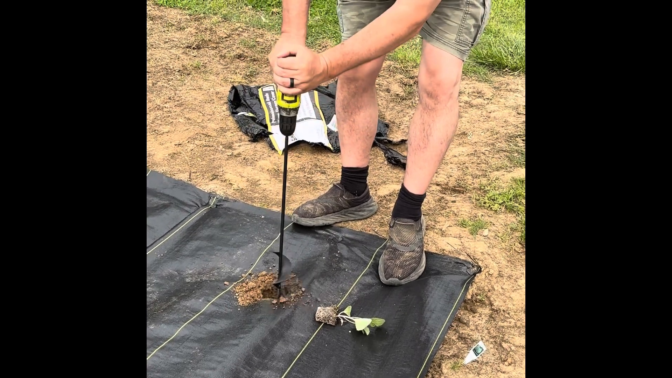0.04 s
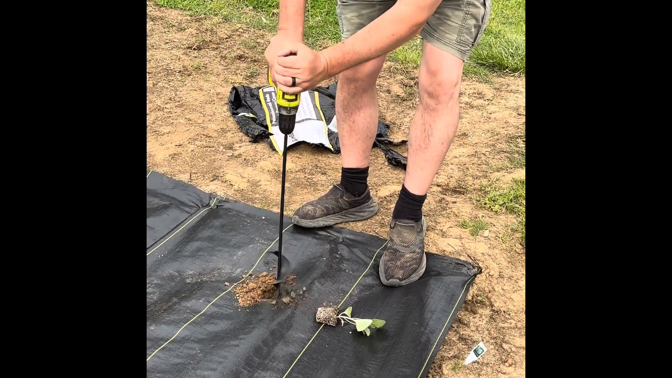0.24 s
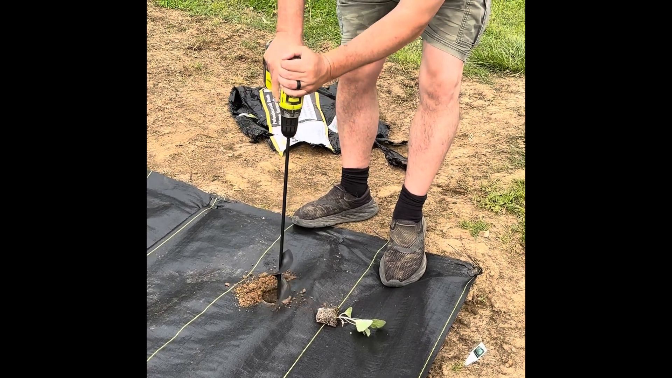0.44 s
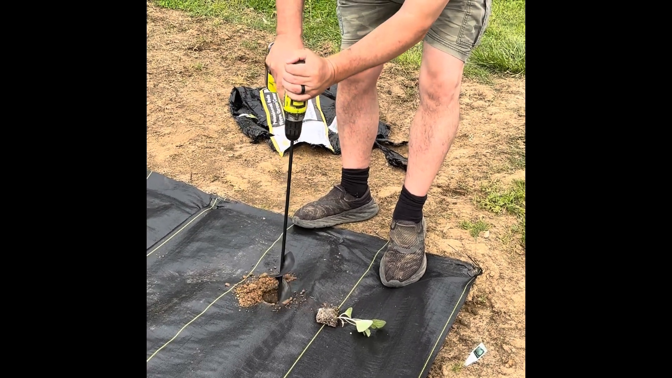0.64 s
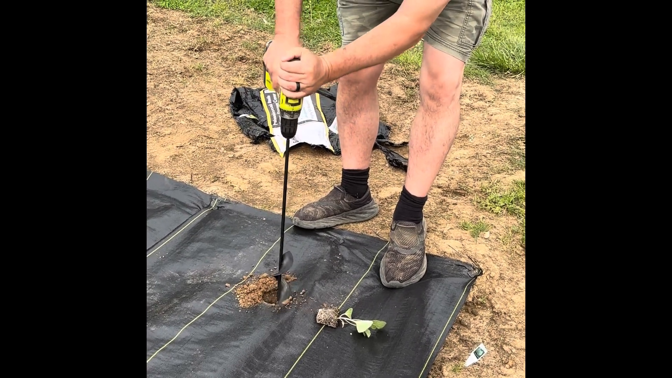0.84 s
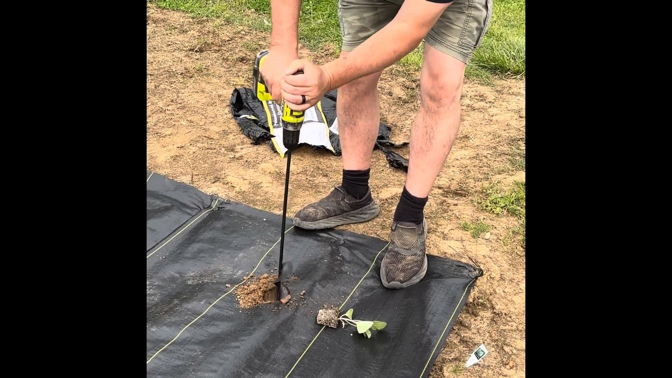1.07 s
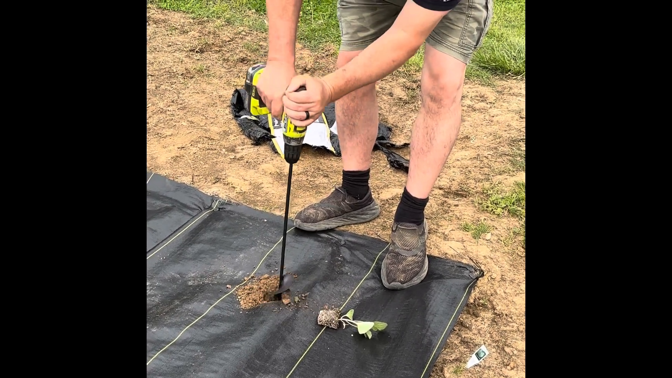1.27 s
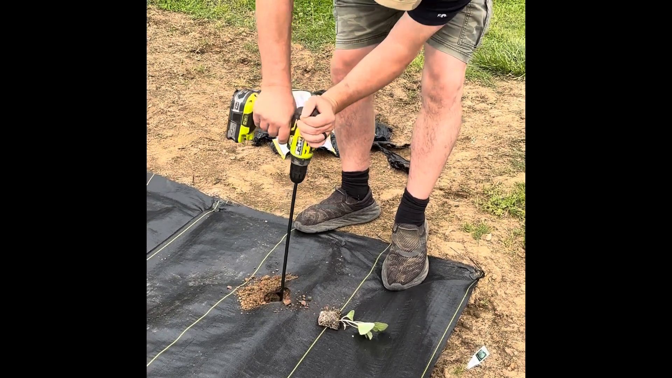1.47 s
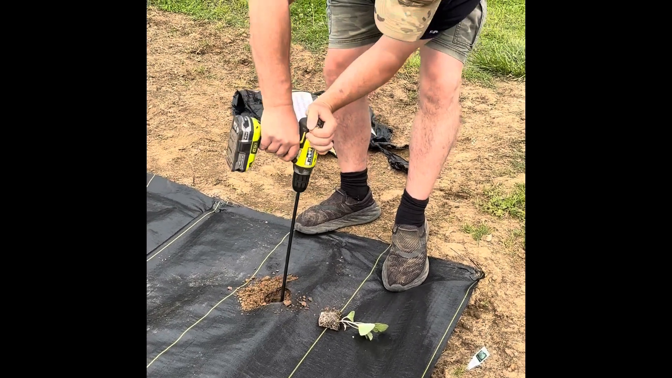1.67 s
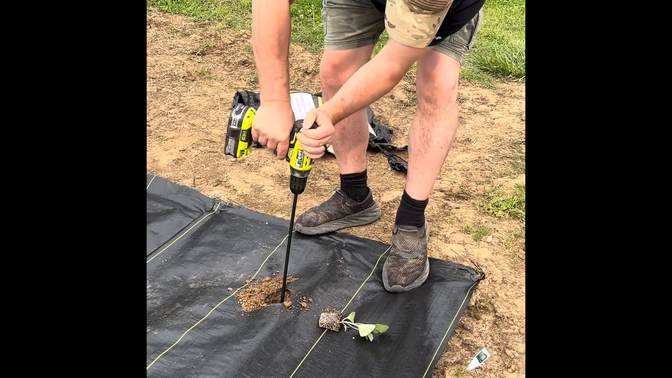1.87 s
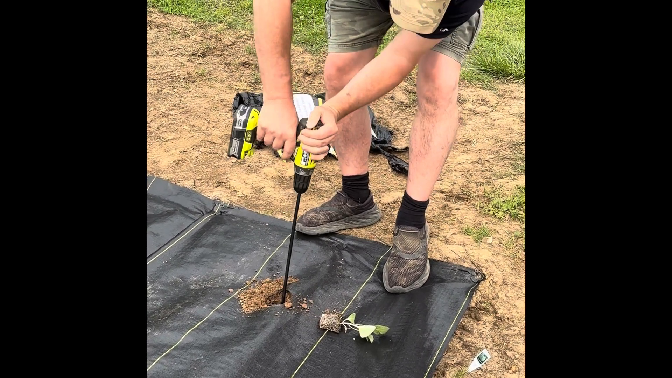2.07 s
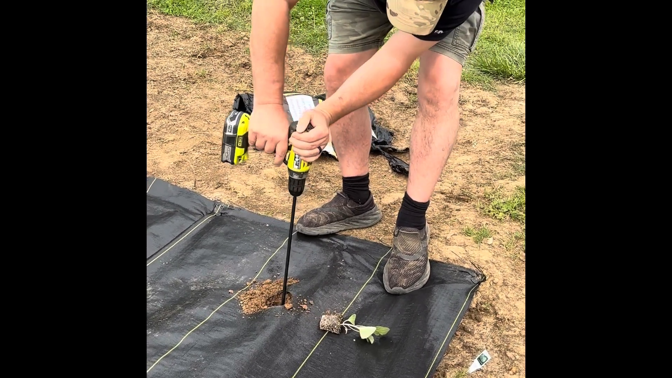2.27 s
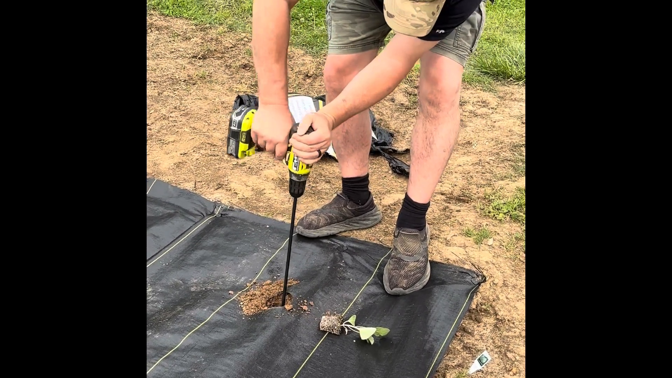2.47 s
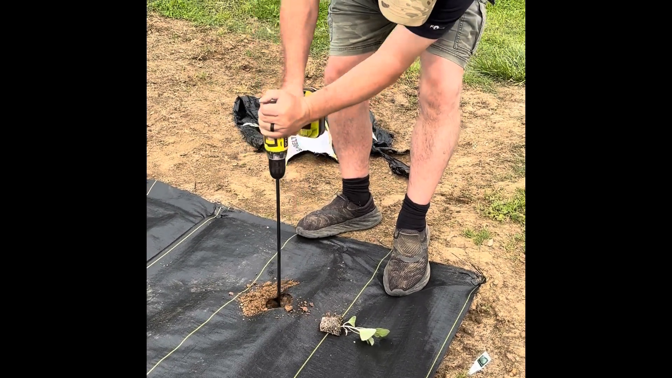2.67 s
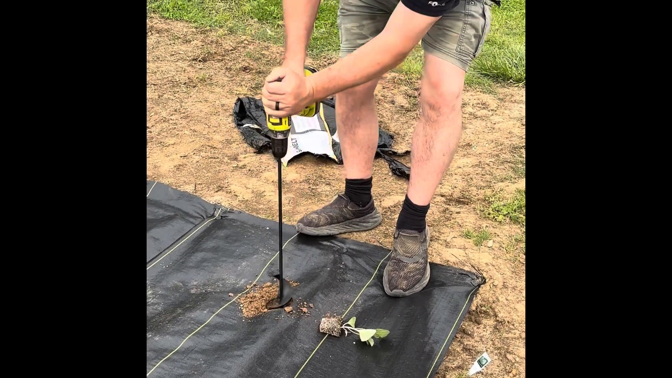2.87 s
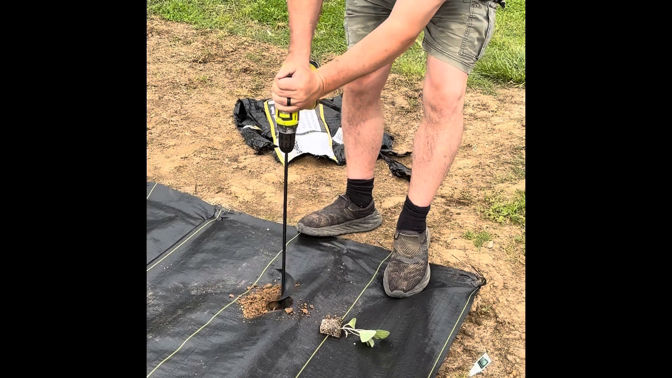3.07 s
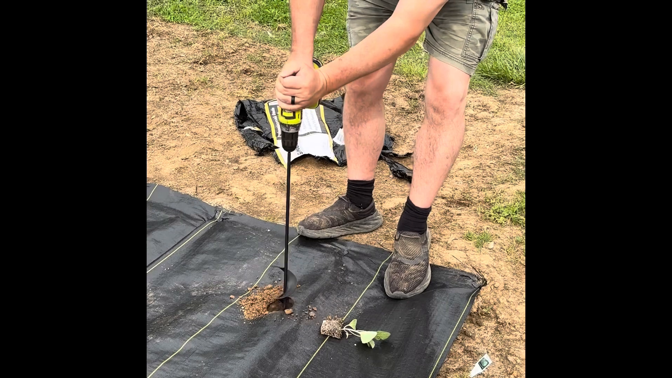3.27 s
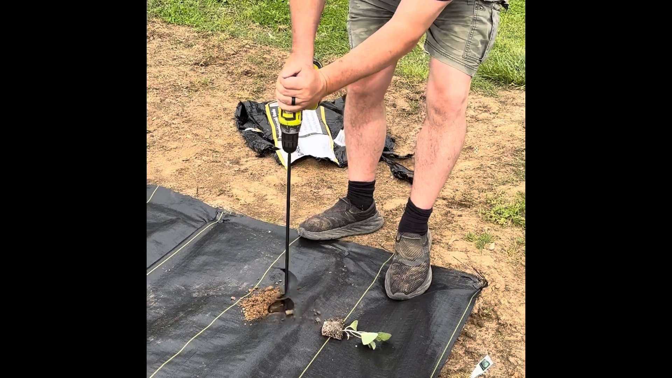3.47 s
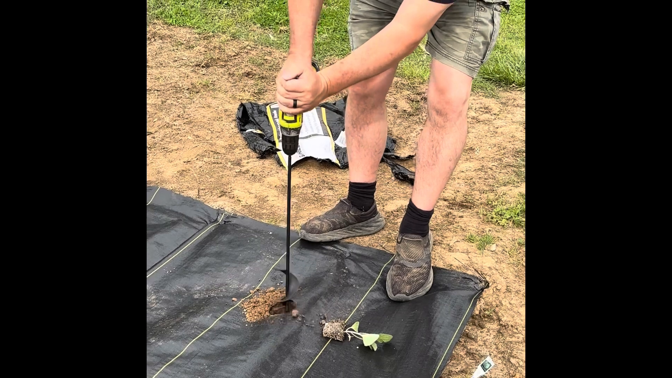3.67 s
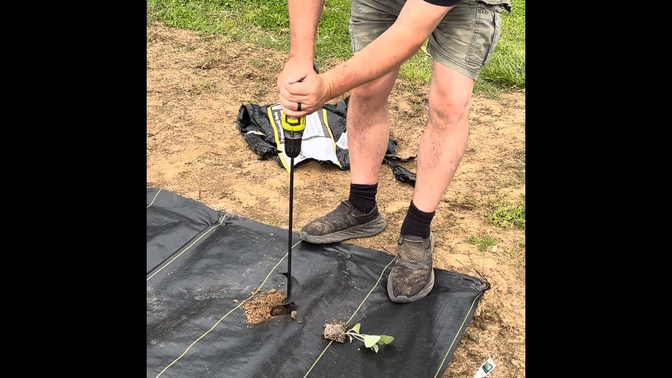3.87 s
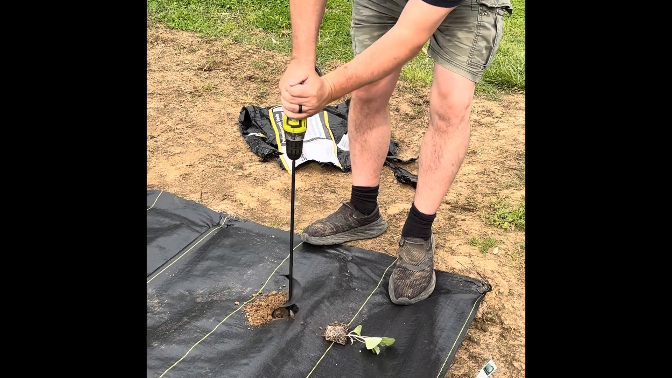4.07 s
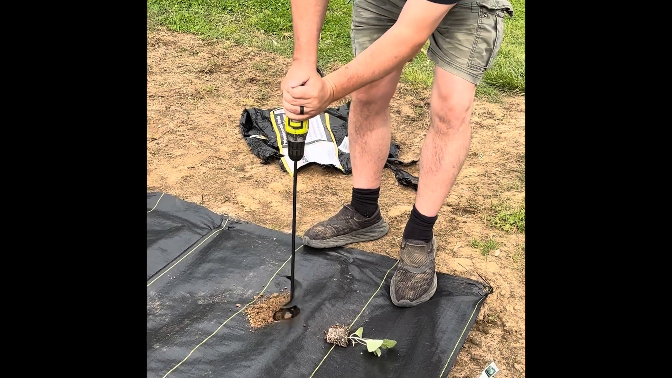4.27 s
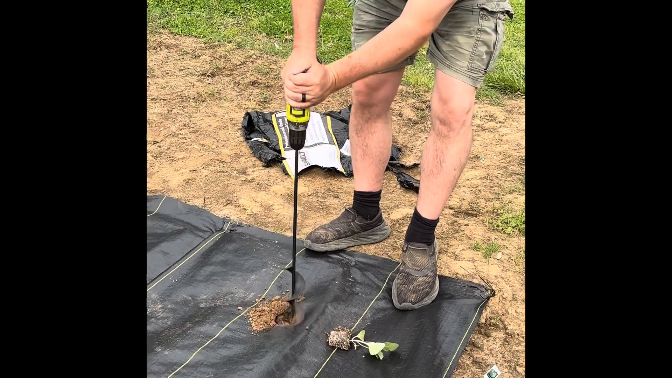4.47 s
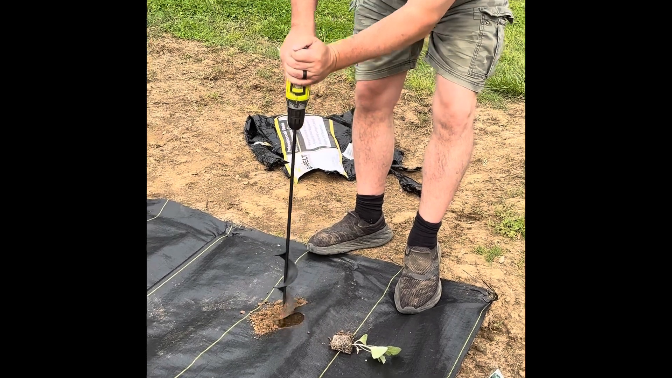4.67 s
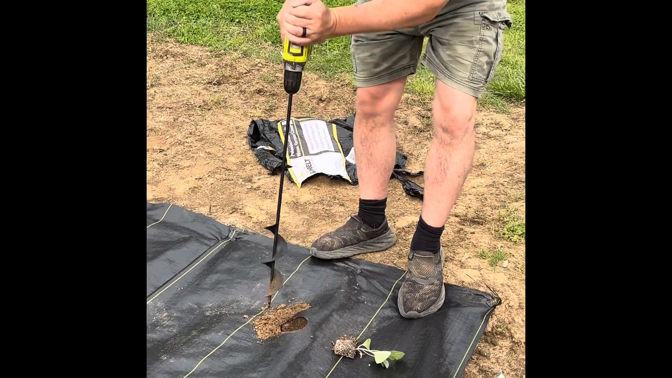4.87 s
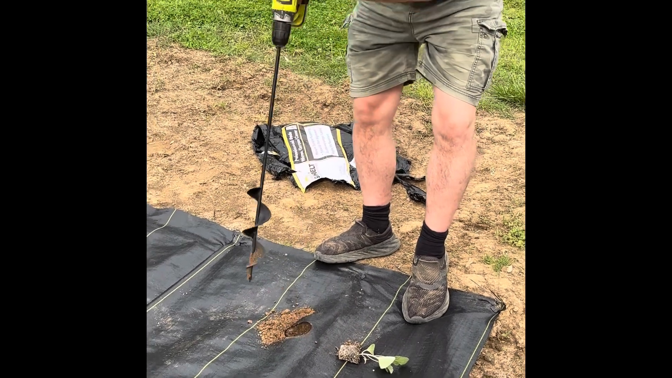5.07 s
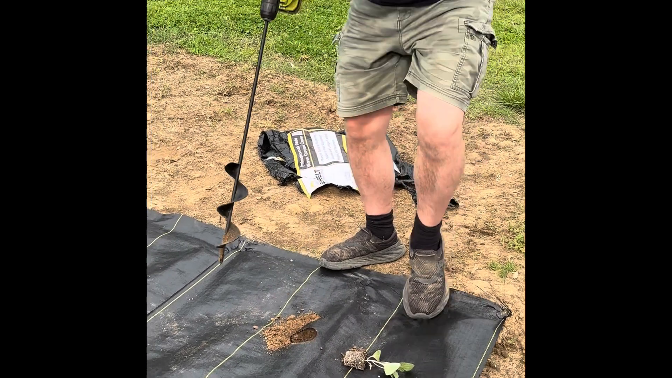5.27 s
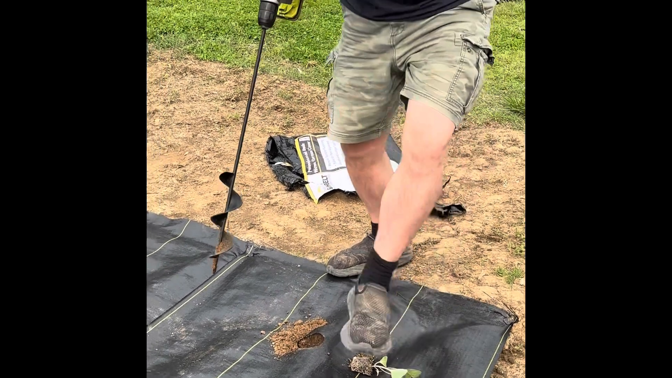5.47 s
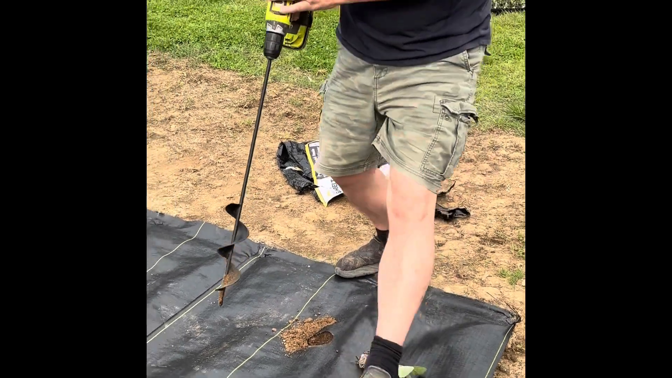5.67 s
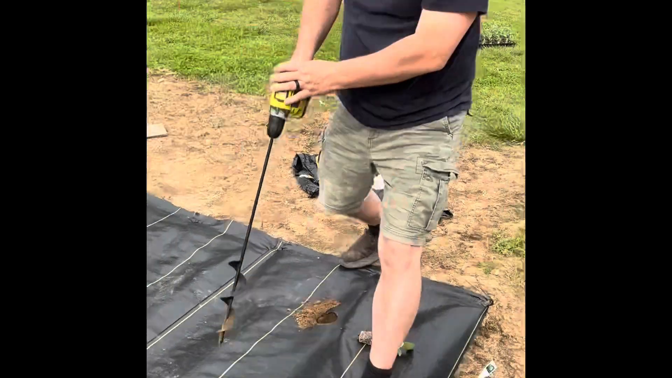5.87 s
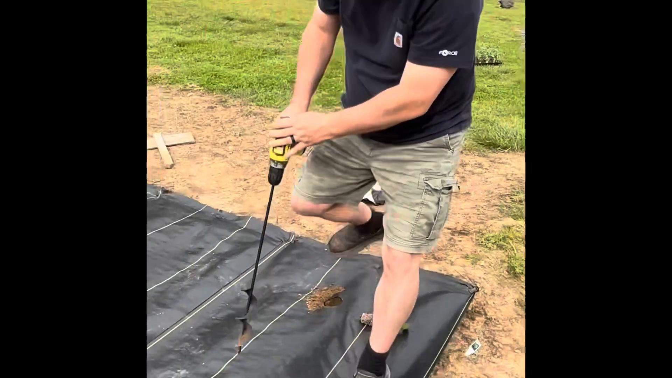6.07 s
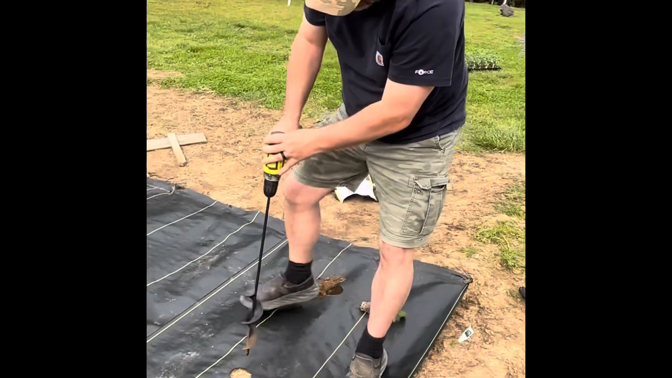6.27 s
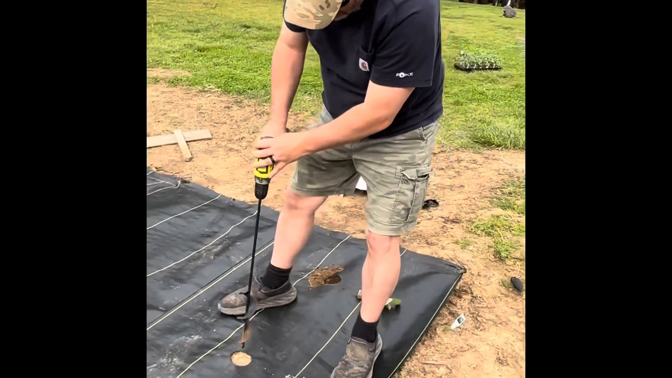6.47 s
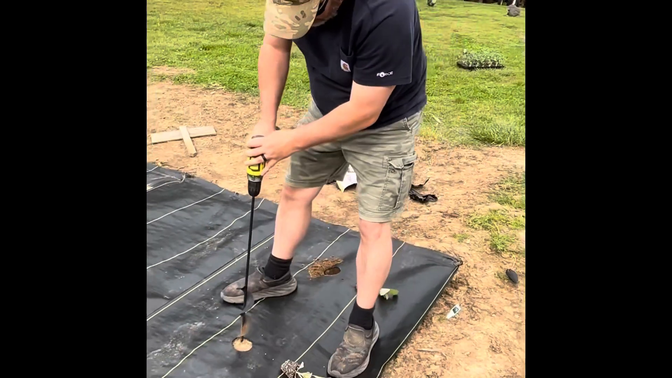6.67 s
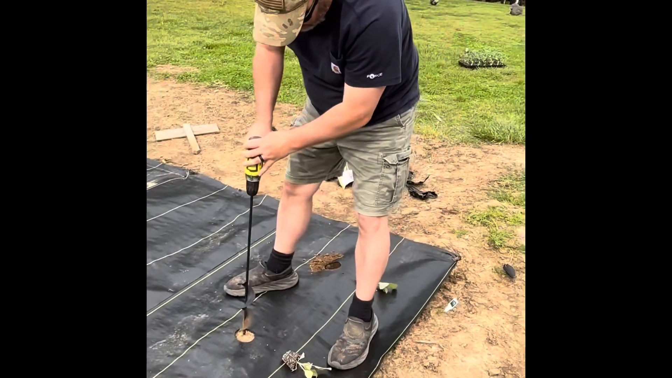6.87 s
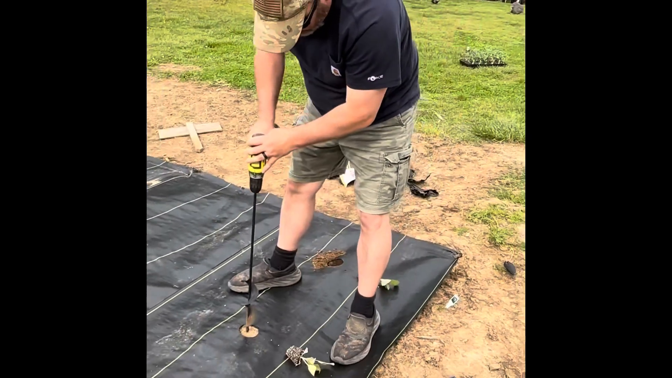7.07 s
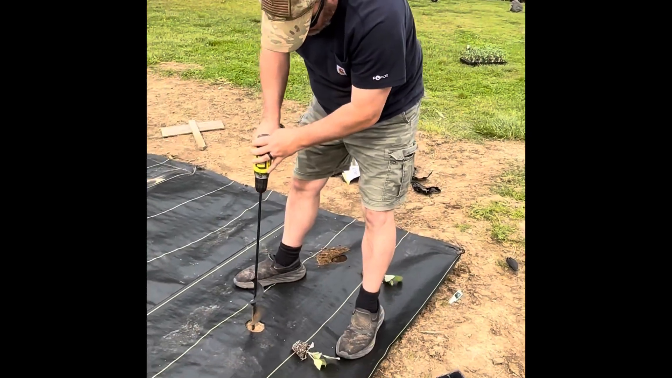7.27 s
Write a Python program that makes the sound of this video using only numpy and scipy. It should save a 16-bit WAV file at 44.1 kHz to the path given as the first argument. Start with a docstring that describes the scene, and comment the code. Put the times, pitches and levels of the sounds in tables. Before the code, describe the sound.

A cordless drill whines and grinds an auger into soil in three bursts, then shoes shuffle on ground fabric while distant birds call outdoors.

```python
"""Cordless drill and planting auger

A garden outdoors: at close range a cordless drill turns an auger into the soil in three bursts.
Gear teeth scrape and whine, sagging in pitch as the soil grips; clods knock and the trigger clicks.
Shoes shuffle over ground fabric near the two-port microphone, with noise grains for soil and weave.
Far off, gliding tones make birds and poultry; coloured noise makes the air and a rising wind."""
import sys
import numpy as np
from scipy import signal
from scipy.fft import rfft, irfft
from scipy.io import wavfile
from scipy.ndimage import uniform_filter1d

SR = 44100
rng = np.random.default_rng(int(sys.argv[2]) if len(sys.argv) > 2 else 0)


def wav_out(sig):
    """Save sig, one row per channel (or a flat mono array), as 16-bit PCM at SR to the path in sys.argv[1]."""
    wavfile.write(sys.argv[1], SR, np.round(np.clip(np.atleast_2d(sig).T, -1, 1) * 32767).astype(np.int16))


N = 322812
TIME, HZ = np.arange(N) / SR, np.fft.rfftfreq(N, 1 / SR)

# Levels are relative: a source's own gain or filter may still shift them.
# trigger pulls: (start [s], stop [s], level [dB], grinding growth [dB/s], treble [dB],
# dulling [dB/s], gear whine [dB], cooling fan [dB])
PULLS = [(-.3, 0.352, -40, -3, 2, 4, -11.5, -13), (0.801, 1.654, -37, -12, 5, 0, -8, 0),
         (2.355, 4.673, -45.5, 2.5, 5, 3, 5.5, 18.5)]
SWITCH_S = 0.0093  # time constant of the trigger's soft closing
SPIN_UP_DB, SPIN_UP_S = 26.5, 0.048  # the drill starts this far down and closes in on its level
SPIN_UP_DULL_DB = 21.5  # its treble starts further down still
WHINE_FADE_DB_PER_S = 2  # the whine sinks into the grinding as a pull goes on
# letting go: a dull jolt, then a quick stop
BRAKE_DB_PER_S, BRAKE_S, BRAKE_DB, BRAKE_DULL_DB = 733.5, 0.0067, 6, 16
# gear speed through the pulls: (time [s], teeth meeting [1/s])
TOOTH_RATE = [(0, 3040), (.25, 3070), (.39, 2950), (.81, 2300), (.88, 3230), (.94, 3540), (1, 3490),
              (1.07, 3240), (1.21, 3170), (1.25, 2960), (1.3, 2510), (1.4, 1770), (1.45, 1490), (1.5, 1290),
              (1.54, 1235), (1.59, 1235), (1.68, 1030), (2.48, 2830), (2.54, 2290), (2.63, 2150),
              (2.7, 2220), (2.78, 2480), (2.92, 2700), (2.99, 2590), (3.04, 2660), (3.1, 2870),
              (3.28, 2810), (3.38, 3010), (3.5, 2960), (3.77, 3030), (3.88, 2965), (3.98, 2975),
              (4.08, 2880), (4.25, 2940), (4.45, 3250), (4.56, 3345), (4.72, 2820)]
TEETH, FAN_ORDER, CARRIER_RATIO = 15, 16, 3  # teeth and fan cycles per shaft turn; turns per carrier turn
RASP, RASP_HZ = .36, 200  # uneven teeth fray each gear tone: depth, rate
RATTLE_SHARE, RATTLE_LOAD_SHARE = .3, .4  # rattle when free, and what full load adds
# shell resonances: (frequency [Hz], width [Hz], lift in the first, second, third pull [dB])
SHELL_MODES = [(1450, 260, 2.5, 2.5, 2), (2100, 350, 1.5, 0, 1), (3450, 400, 0, 3.5, 0),
               (4500, 300, 1, -1, 3), (5030, 220, 3.5, 3.5, 3.5), (5600, 350, 5, 4, 3),
               (6400, 800, 5, 5.5, 2.5), (8000, 450, 5, 3, 3.5), (9450, 800, 5.5, 4.5, 1),
               (11400, 600, 5, 2, 4), (15300, 500, 4, 2, 4)]
SLACK_S, SLACK_LENGTH_S, SLACK_DB = 4.33, 0.19, 36  # the auger breaks free: a slack gear whines less
BITE_HZ_PER_S, BITE_DB = 5000, 7  # teeth sing out fully when the tooth rate falls this fast
RUSH_DB, RUSH_WIDTH_HZ = -17.5, 180  # air through the cooling fan
GRIT_DB, GRIT_PER_S, GRIT_S = -7, 110, .002  # stones in the soil tick against the spiral
# gear whine: (multiple of the tooth rate, level [dB])
WHINE_ORDERS = [(1, 3), (2, 4), (3, 5.5), (4, 10.5), (5, -1), (6, 5)]
# how well the gear case passes the whine: (frequency [Hz], gain [dB])
GEAR_CASE_GAIN = [(1100, 3.5), (1700, -2), (2200, 3), (2600, -1), (3000, 0), (4000, -1.5), (5000, -.5),
                  (6300, -2), (7200, -7), (8200, -10), (9000, -10)]
# weaker gear tones: (multiple of the planet carrier's speed, level [dB])
CARRIER_TONES = [(4, -33.5), (11, -29), (20, -25.5), (28, -37), (40, -33), (76, -35)]
MOTOR_FLUTTER_DB = 5
# spectrum of the grinding through the housing: (frequency [Hz], density [dB per Hz])
HOUSING_SPECTRUM = [(100, -15), (300, -21.5), (700, -19), (950, 1.5), (1500, 2), (2200, 2.5), (2900, 0.5),
                    (3800, -2), (5000, -3), (6800, -5), (10000, -9), (13000, -11), (15500, -8)]
# spectrum of hard plastic and grit cracks: (frequency [Hz], density [dB per Hz])
CLICK_SPECTRUM = [(150, -1.5), (500, -9.5), (1100, 5.5), (1800, 2), (3000, 8.5), (5000, 0.5), (8000, 2),
                  (12000, -8.5), (15500, 4)]
# spectrum of shoes on woven fabric: (frequency [Hz], density [dB per Hz])
FABRIC_SPECTRUM = [(100, -0.5), (300, -40), (700, -4.5), (1200, 1.5), (2000, 1), (4500, -1.5), (7000, -9.5),
                   (10000, -11), (15000, -12)]
# spectrum of the garden's hush: (frequency [Hz], density [dB per Hz])
AIR_SPECTRUM = [(20, -30), (45, 1.5), (100, 17.5), (200, 10.5), (400, 8.5), (800, 4.5), (1500, -14.5),
                (3000, 2.5), (5000, -26), (8000, -50), (15000, -13)]
# spectrum of moving soil: (frequency [Hz], density [dB per Hz])
SOIL_SPECTRUM = [(60, -42), (150, -13), (260, -10.5), (420, -5), (800, -3), (1300, -12), (4000, -59)]
# spectrum of wind on the microphone: (frequency [Hz], density [dB per Hz])
WIND_SPECTRUM = [(25, -57.5), (50, -5), (110, -7), (250, -10.5), (900, -26), (5000, -92)]
# spectrum of a sole on grit: (frequency [Hz], density [dB per Hz])
SOLE_SPECTRUM = [(150, -3), (450, -9), (900, -3), (2200, 4.5), (3200, -10), (8000, -25)]
# phase between the microphone ports for close sources: (frequency [Hz], lead of the left [rad])
PORT_LEAD = [(0, 0), (1600, 0), (2600, 2.3), (3800, 1.1), (5000, 1), (5700, 3.14), (7000, 4.9),
             (8200, 6.28), (9400, 7.4), (10900, 9.42), (12200, 11), (13500, 12.57), (15900, 15.7)]
# level between the ports for close sources: (frequency [Hz], left minus right [dB])
PORT_TILT = [(300, 0.5), (700, 4.5), (1000, 6), (1600, 3.5), (2300, -0.5)]
# trigger clicks and snaps of grit: (time [s], level [dB], 60 dB decay [s])
CLICK_EVENTS = [(.468, -41, 0.019), (0.54, -38, 0.048), (0.551, -34, 0.015), (.815, -43, 0.02),
                (0.822, -50, 0.026), (0.836, -35, 0.029), (0.852, -26, 0.013), (0.973, -36, 0.024),
                (1.422, -38, 0.0056), (2.095, -58, 0.033), (2.167, -32, 0.029), (2.182, -20, 0.0091),
                (2.393, -44, 0.035), (2.444, -34.5, 0.28), (2.49, -36.5, 0.68), (5.369, -34.5, 0.03),
                (5.382, -41, 0.041), (5.489, -51, 0.011), (5.767, -47, 0.029), (5.902, -25, 0.005),
                (5.92, -46, .008), (6.4, -43, 0.01), (6.426, -43, .008), (6.437, -43, 0.026),
                (6.651, -49.5, 0.014), (7.252, -47.5, 0.017)]
# clods against the auger and footfalls: (time [s], level [dB], ring [Hz], 60 dB decay [s])
KNOCK_EVENTS = [(.026, -30.5, 330, 0.021), (.191, -33.5, 238, 0.07), (.225, -42, 203, 0.14),
                (.348, -34, 513, 0.054), (.975, -37.5, 494, 0.031), (1.881, -40, 221, 0.035),
                (2.446, -36.5, 626, 0.063), (3.409, -39.5, 408, 0.036), (3.606, -34.5, 444, 0.059),
                (3.802, -27.5, 389, 0.037), (3.996, -43.5, 380, 0.059), (4.207, -26.5, 280, 0.038),
                (4.929, -52.5, 610, 0.065), (5.136, -53, 660, 0.1), (5.768, -40, 125, 0.035),
                (5.79, -58.5, 75, 0.38), (6.15, -47.5, 398, 0.04), (6.548, -48.5, 564, 0.075),
                (7.208, -56, 334, 0.11), (7.253, -32, 234, 0.026)]
# loose soil tumbling off the spiral: (time [s], length [s], level [dB])
SOIL_SPILLS = [(0, 0.066, -55.5), (0.158, 0.22, -58.5), (2.399, 0.11, -59.5), (4.407, 0.29, -57.5)]
CHURN_DB = -63.5  # the steady churn while the auger turns
GROAN_S, GROAN_LENGTH_S, GROAN_DB = 4.22, 0.449, -67  # the shaft rings at the bottom of the hole
# shoes and clothes on the fabric: (time [s], length [s], hiss [dB], soil pressed under it [dB])
SCUFF_EVENTS = [(0.35, 0.35, -61.5, -67), (1.657, 0.15, -44.5, -68), (1.948, 0.27, -69.5, -95),
                (2.175, 0.19, -90, -72), (4.69, 0.15, -74.5, -68.5), (5.166, 0.063, -57.5, -99),
                (5.308, 0.64, -72.5, -102), (5.74, 0.2, -53.5, -70), (5.937, 0.17, -65, -67.5),
                (6.316, 0.1, -60.5, -65), (6.386, 0.064, -58, -61), (6.53, 0.16, -68, -69),
                (6.672, 0.13, -64, -64), (6.88, 0.25, -96, -68), (7.236, 0.041, -52.5, -53)]
SCUFF_ATTACK_S, SCUFF_SAG_DB, SCUFF_T60_S = 0.061, 9, 0.28  # each rub bites, eases and dies away
CLOTHES_DB = -76  # the faint brushing of clothes that never quite stops
# a sole grinding on grit: (time [s], length [s], level [dB])
SOLE_SCRAPES = [(0.438, 0.056, -61), (0.524, 0.029, -51), (5.76, 0.1, -57.5), (7.254, 0.031, -56)]
# a low creak as the auger comes out; it swells while its two resonances draw together
CREAK_S, CREAK_LENGTH_S, CREAK_DB, CREAK_SWELL_DB = 4.927, 0.2, -65, 11.5
CREAK_LOW_HZ, CREAK_HIGH_HZ = (211, 328), (806, 565)  # (at first, at the end)
GUST_S, GUST_RISE_S, CALM_DB, GUST_DB = 5.93, 0.45, -95.5, -73.5  # wind reaches the microphone
# one bird's repeated pair of notes: (time [s], level [dB])
COUPLET_STARTS = [(4.799, -69.5), (5.215, -70), (5.656, -72), (6.078, -67)]
# the rising and the falling note: (delay [s], length [s], start [Hz], end [Hz], level offset [dB])
COUPLET_NOTES = [(0, 0.046, 1783, 2530, 2), (0.223, 0.0614, 2886, 2630, 4)]
# nearly level whistles: (time [s], length [s], pitch [Hz], level [dB])
WHISTLE_NOTES = [(4.742, 0.47, 2955, -78), (5.646, 0.13, 3585, -64.5), (5.783, 0.21, 3710, -65),
                 (5.886, 0.21, 2590, -73), (5.974, 0.083, 3630, -56.5), (6.267, 0.22, 3652, -57.5),
                 (6.5, 0.035, 3510, -67), (6.67, 0.161, 3714, -61), (6.832, 0.12, 3720, -62.5),
                 (7.078, 0.12, 3800, -60), (7.256, 0.063, 3750, -65)]
WHISTLE_SAG_HZ = 31  # a whistle starts this far above its pitch and ends half as far below
# falling chirps: (time [s], length [s], start [Hz], end [Hz], level [dB])
CHIRP_NOTES = [(0.657, 0.085, 4850, 2760, -71), (0.731, 0.13, 2570, 1670, -68),
               (0.666, 0.03, 1495, 1340, -62), (4.936, 0.065, 3980, 3260, -66),
               (6.223, 0.071, 4120, 3100, -59), (6.521, 0.041, 3230, 2700, -63.5),
               (7.225, 0.053, 4180, 3070, -59)]
# a hoarse bird far off
CHATTER_S, CHATTER_LENGTH_S, CHATTER_HZ, CHATTER_WIDTH_HZ, CHATTER_DB = 6.9, .4, 2590, 1600, -70.5
# far poultry: (time [s], length [s], start [Hz], end [Hz], level [dB])
FOWL_CALLS = [(1.72, 0.715, 587, 584, -56)]
# short far yelps: (time [s], length [s], start [Hz], end [Hz], level [dB])
YELP_CALLS = [(6.3, 0.056, 1217, 1096, -61.5), (6.305, 0.06, 613, 540, -62.5), (6.52, 0.037, 658, 633, -64),
              (6.58, 0.089, 602, 552, -67), (6.59, 0.038, 1100, 1187, -62.5),
              (6.615, 0.018, 1440, 1393, -60), (6.638, 0.043, 980, 882, -59)]
EDGE_HZ = 15850  # the recorder's upper band limit


def gain_of(db):
    """Decibels to amplitude."""
    return np.exp(np.log(10) / 20 * np.asarray(db))


def evened(x):
    """Scales to rms 1."""
    return x / np.sqrt(np.mean(x ** 2) + 1e-20)


def read(points, hz=HZ):
    """Reads a table along log frequency."""
    f, value = np.transpose(points)
    return np.interp(np.log(hz + 1), np.log(f + 1), value)


def colour(x, points):
    """Gives a sound a spectrum and keeps the power of white noise."""
    return irfft(rfft(x) * evened(gain_of(read(points))), N)


def ramp(s, length):
    """Goes from 0 to 1 over a stretch of time."""
    return np.clip((TIME - s) / length, 0, 1)


def stroke(s, length, attack, sag_db, t60):
    """An envelope: attack, a hold that sags (or swells if negative), release."""
    release = np.clip((TIME - s - length) / t60, 0, 2)
    return ramp(s, attack) * gain_of(-sag_db * ramp(s, length) - 60 * release)


def wander(hz):
    """Slow random drift of rms 1, up to a rate."""
    return evened(irfft(rfft(rng.standard_normal(N)) / (1 + (HZ / hz) ** 4), N))


def grains(per_s, spread_db):
    """Sparse clicks of uneven size and random sign; rms 1."""
    size = gain_of(spread_db * np.minimum(rng.exponential(1, N), 4))
    return evened(size * rng.choice([-1, 1], N) * (rng.random(N) < per_s / SR))


def crumbs(per_s, decay_s):
    """Sparse, short crunches; rms 1."""
    decay = np.exp(-1 / (decay_s * SR))
    envelope = signal.lfilter([1], [1, -decay], abs(grains(per_s, spread_db=1.5)))
    return evened(envelope * rng.standard_normal(N))


def add(mix, s, sound):
    """Lays a sound into the mix at a time."""
    part = mix[max(round(s * SR), 0):][:len(sound)]
    part += sound[:len(part)]


def resonate(x, hz, width):
    """A steep resonance that follows the curve hz; rms 1."""
    turn = np.exp(2j * np.pi * np.cumsum(hz * np.ones(N)) / SR)
    r = np.exp(-np.pi * width / SR)
    # shift the band to zero, low-pass it twice, shift it back
    return evened((turn * signal.lfilter([(1 - r) ** 2], [1, -2 * r, r * r], x / turn)).real)


def trigger():
    """Each pull spins up, digs in and brakes: running 0-1, then level, grinding, treble, whine, fan [dB]."""
    controls = np.zeros((6, N))
    for start, stop, db, growth, treble_db, dulling, whine_db, fan_db in PULLS:
        on = TIME >= start
        t = TIME[on] - start
        late = np.maximum(TIME[on] - stop, 0)
        held = np.minimum(TIME[on], stop) - start
        jolt = np.exp(-(np.minimum(TIME[on] - stop, 0) / BRAKE_S) ** 2)
        lag = np.exp(-t / SPIN_UP_S)
        running = 1 - np.exp(-t / SWITCH_S)
        running *= gain_of(-SPIN_UP_DB * lag - BRAKE_DB_PER_S * np.minimum(late, .5))
        dig_db = growth * held + BRAKE_DB * jolt
        bright_db = treble_db - dulling * held - BRAKE_DULL_DB * jolt - SPIN_UP_DULL_DB * lag
        sing_db = whine_db - WHINE_FADE_DB_PER_S * held
        controls[:, on] = np.broadcast_arrays(running, db, dig_db, bright_db, sing_db, fan_db)
    return controls


def shell(x):
    """The shell rings differently in each pull, as the hands change their grip."""
    pull = np.searchsorted([row[0] for row in PULLS], TIME, side="right") - 1
    lift_db = sum(np.outer(lifts, 1 / (1 + (2 * (HZ - hz) / width) ** 4))
                  for hz, width, *lifts in SHELL_MODES)
    return np.choose(pull, irfft(rfft(x) * gain_of(lift_db), N))


def grinding(shaft, mesh, load, throb):
    """Teeth scrape once per mesh, shaft orders rattle and stones tick, all heard through the housing."""
    scrape = rng.standard_normal(N) * (1 + 0.71 * np.cos(mesh)) + .5 * grains(2500, spread_db=0.0)
    # uneven teeth repeat every turn: a faint comb of shaft orders, each swelling and fading
    wobbling = shaft + 0.19 * wander(26)
    knots = np.linspace(0, TIME[-1], 170)
    comb = 0
    for order in range(4, 44):
        tone = np.cos(order * wobbling + rng.uniform(0, 2 * np.pi))
        comb = comb + tone * np.interp(TIME, knots, rng.standard_normal(len(knots)))
    rattle = (RATTLE_SHARE + RATTLE_LOAD_SHARE * load) * evened(comb)
    grit = gain_of(GRIT_DB) * crumbs(GRIT_PER_S, GRIT_S)
    return shell(colour(evened(scrape + rattle + grit) * throb, HOUSING_SPECTRUM))


def gear_whine(tooth_hz, mesh, load, bite, slack, flutter_db=2.5, dull_hz=7200):
    """Meshing teeth sing in overtones; a free gear has few, and the housing muffles the highest."""
    whine, fray = 0, wander(RASP_HZ) + 1j * wander(RASP_HZ)
    for order, db in WHINE_ORDERS:
        hz = order * tooth_hz
        level_db = db + read(GEAR_CASE_GAIN, hz) + flutter_db * wander(45)
        level_db -= (order - 1) * (3 * (1 - np.maximum(load, bite)) + 6 * slack)
        # shifting the fray in time frays each order differently
        tone = ((1 + RASP * np.roll(fray, order * SR)) * np.exp(1j * order * mesh)).real
        whine = whine + gain_of(level_db) * tone / np.hypot(1, (hz / dull_hz) ** 5)
    # straining teeth chatter
    return whine * gain_of((.8 + load) * np.clip(wander(110), -3, 1.5) + np.clip(wander(16), -2, 1))


def carrier_tones(shaft, tooth_hz, load, bite, level_db=9.5, load_db=-6.0):
    """Planet carrier orders flutter, sink under load and rise as the soil bites."""
    tones = 0
    for order, db in CARRIER_TONES:
        housing_db = .5 * read(HOUSING_SPECTRUM, order * tooth_hz / TEETH / CARRIER_RATIO)
        level = gain_of(db + MOTOR_FLUTTER_DB * wander(26.0) + housing_db)
        tones = tones + level * np.cos(order * shaft / CARRIER_RATIO)
    return tones * gain_of(level_db + load_db * load + .5 * BITE_DB * bite)


def cooling_fan(shaft, tooth_hz, blade_db, bright_db, fan_db=-19.0):
    """Blades hum at a multiple of the shaft speed, and air rushes round that note."""
    hum = gain_of(fan_db + blade_db + 2.6 * wander(28)) * np.cos(FAN_ORDER * shaft)
    rush = resonate(rng.standard_normal(N), FAN_ORDER * tooth_hz / TEETH, RUSH_WIDTH_HZ)
    return hum + gain_of(RUSH_DB + bright_db) * rush


def drill(grind_db=1.0, treble_db=1.0, whine_db=-3.0, load_db=1.5, jitter=0.00574,
          load_jitter=0.01037, free_hz=3200):
    """Gear teeth scrape and whine through the housing; low speed counts as load, and a fall as bite."""
    tooth_hz = np.interp(TIME, *np.transpose(TOOTH_RATE))
    running, effort_db, dig_db, bright_db, sing_db, blade_db = trigger()
    load = np.clip((1 - tooth_hz / free_hz) / 0.33, 0, 1)
    slowing = np.clip(-np.gradient(tooth_hz) * SR / BITE_HZ_PER_S, 0, 1)
    bite = uniform_filter1d(slowing ** 2, size=1500)
    slack = ramp(SLACK_S, SLACK_LENGTH_S)
    shaft = 2 * np.pi * np.cumsum(tooth_hz * (1 + 0.005 * wander(16))) / SR / TEETH
    unsteady = (jitter + load_jitter * load) * wander(257.6)
    mesh = TEETH * shaft + 2 * np.pi * np.cumsum(tooth_hz * unsteady) / SR
    # the sound swells once a shaft turn and jolts as the auger catches
    throb = gain_of(0.43 * np.cos(shaft) + (-0.13 + .5 * load) * wander(69) + 0.57 * wander(4.3))
    grind = grinding(shaft, mesh, load, throb)
    treble = irfft(rfft(grind) * HZ ** 2 / (HZ ** 2 + 2600 ** 2), N)
    grind = grind + (gain_of(bright_db + treble_db) - 1) * treble
    whine = gear_whine(tooth_hz, mesh, load, bite, slack)
    whine *= gain_of(whine_db + load_db * load - SLACK_DB * slack + BITE_DB * bite + sing_db)
    whine *= 1 + 0.18 * np.cos(shaft)
    tones = whine * throb + carrier_tones(shaft, tooth_hz, load, bite)
    tones += cooling_fan(shaft, tooth_hz, blade_db, bright_db)
    # running counts twice for the tones, so they come in later than the grinding
    return running * gain_of(effort_db) * (gain_of(grind_db + dig_db) * grind + running * tones)


def clicks():
    """Short cracks of hard plastic and grit: decaying bursts of noise."""
    out, t = np.zeros(N), TIME[:SR // 8]
    for s, db, t60 in CLICK_EVENTS:
        envelope = gain_of(db - 60 * t / t60) * (1 - np.exp(-t / .0004))
        add(out, s, envelope * rng.standard_normal(len(t)))
    return colour(out, CLICK_SPECTRUM)


def knocks(level_db=-0.5, crumble=0.67, rise_s=0.0077):
    """Each blow is a dull ring and a puff of crumbling earth."""
    out, t = np.zeros(N), TIME[:SR // 4]
    earth = colour(rng.standard_normal(N), SOIL_SPECTRUM)
    for k, (s, db, hz, t60) in enumerate(KNOCK_EVENTS):
        blow = np.sin(2 * np.pi * hz * t) + crumble * earth[k * len(t):][:len(t)]
        add(out, s, gain_of(db - 60 * t / t60) * (1 - np.exp(-t / rise_s)) * blow)
    return gain_of(level_db) * out


def churn(groan_hz=292, groan_width_hz=45):
    """Lumps of soil tumble while the auger turns; their drag sets the shaft ringing."""
    groan = stroke(GROAN_S, GROAN_LENGTH_S, attack=0.013, sag_db=-8.0, t60=0.066)
    groan *= resonate(rng.standard_normal(N), groan_hz, groan_width_hz)
    spills = sum(gain_of(db) * stroke(s, length, attack=0.032, sag_db=3.5, t60=0.029)
                 for s, length, db in SOIL_SPILLS)
    running = trigger()[0]
    lumps = colour(grains(900, spread_db=1.5), SOIL_SPECTRUM)
    return (gain_of(CHURN_DB) * running + spills) * lumps + gain_of(GROAN_DB) * groan


def creak(slip_hz=85, low_width_hz=140, high_width_hz=400, top_hz=900):
    """Uneven slips ring two low resonances that draw together."""
    along = ramp(CREAK_S, CREAK_LENGTH_S)
    slip_count = np.floor(np.cumsum(slip_hz * (1 + .3 * wander(60))) / SR)
    drive = evened(np.diff(slip_count, prepend=0)) + 2.0 * rng.standard_normal(N)
    low = resonate(drive, np.interp(along, [0, 1], CREAK_LOW_HZ), low_width_hz)
    high = resonate(drive, np.interp(along, [0, 1], CREAK_HIGH_HZ), high_width_hz)
    share = np.clip(.75 - 0.7 * along, 0, 1)  # power moves from the low to the high resonance
    level = stroke(CREAK_S, CREAK_LENGTH_S, attack=0.007, sag_db=-CREAK_SWELL_DB, t60=0.15)
    ringing = gain_of(CREAK_DB) * level * (np.sqrt(share) * low + np.sqrt(1 - share) * high)
    return signal.sosfilt(signal.butter(8, top_hz, fs=SR, output="sos"), ringing)


def scuffs(crackle=0.23):
    """Woven fabric hisses and crackles under the shoes, and the soil beneath it crunches."""
    weave = evened(rng.standard_normal(N) + crackle * grains(970, spread_db=9.0))
    rub = colour(weave * evened(gain_of(1.8 * wander(40))), FABRIC_SPECTRUM)
    lumps = colour(grains(900, spread_db=-4.5), SOIL_SPECTRUM)
    out = gain_of(CLOTHES_DB) * rub
    for s, length, hiss_db, soil_db in SCUFF_EVENTS:
        envelope = stroke(s, length, SCUFF_ATTACK_S, SCUFF_SAG_DB, SCUFF_T60_S)
        out += envelope * (gain_of(hiss_db) * rub + gain_of(soil_db) * lumps)
    return out


def scrapes():
    """A sole lands with its full weight and grinds briefly on grit."""
    level = sum(gain_of(db) * stroke(s, length, attack=0.0025, sag_db=6.5, t60=0.1)
                for s, length, db in SOLE_SCRAPES)
    return level * colour(crumbs(per_s=590, decay_s=0.0019), SOLE_SPECTRUM)


def scatter(x, t60):
    """Diffuse echoes from decaying noise, different at each port."""
    taps = rng.standard_normal((2, SR)) * gain_of(-60 * TIME[:SR] / t60)
    return signal.fftconvolve(x[None], taps / np.linalg.norm(taps[0]), axes=1)[:, :N]


def near(x, echo_db):
    """A close source reaches the left port first; ground and legs scatter its treble."""
    half = gain_of(read(PORT_TILT) / 2) * np.exp(.5j * read(PORT_LEAD))
    # the echoes keep shifting over time
    shifting = np.sqrt(2) * np.cos(2 * np.pi * np.cumsum(25 * wander(6)) / SR)
    echoes = rfft(scatter(x * shifting, t60=.09)) * HZ / (HZ + 1500)
    return irfft(rfft(x) * np.array([half, 1 / half]) + gain_of(echo_db) * echoes, N)


def calls(rows, overtones_db, waver, waver_hz=21):
    """Notes with overtones that glide to their end pitch, slowing a little, with a random waver."""
    out, drift = np.zeros(N), wander(waver_hz)
    for s, length, start_hz, end_hz, db in rows:
        u = np.linspace(0, 1, int(length * SR))
        hz = end_hz + (start_hz - end_hz) * (1 - u) ** 1.25
        hz = hz * (1 + waver * np.roll(drift, -int(s * SR))[:len(u)])
        turn = 2 * np.pi * np.cumsum(hz) / SR
        note = sum(gain_of(d) * np.sin((k + 1) * turn) for k, d in enumerate(overtones_db))
        add(out, s, gain_of(db) * signal.windows.tukey(len(u), .4) * note)
    return out


def birds(level_db=-1.5):
    """Distant songbirds and poultry, as gliding tones and hoarse noise, with the echo of the trees."""
    couplets = [(s + delay, length, start_hz, end_hz, db + note_db)
                for s, db in COUPLET_STARTS
                for delay, length, start_hz, end_hz, note_db in COUPLET_NOTES]
    whistles = [(s, length, hz + WHISTLE_SAG_HZ, hz - WHISTLE_SAG_HZ / 2, db)
                for s, length, hz, db in WHISTLE_NOTES]
    chatter = stroke(CHATTER_S, CHATTER_LENGTH_S, attack=0.016, sag_db=2.0, t60=.2)
    chatter *= gain_of(CHATTER_DB + 2 * wander(27))
    chatter *= resonate(rng.standard_normal(N), CHATTER_HZ, CHATTER_WIDTH_HZ)
    fowl = calls(FOWL_CALLS, [-26, -14, -6, -24], waver=.018)
    fowl *= evened(gain_of(4.5 * wander(45)))  # hoarse
    song = calls(whistles, [0], waver=0.00745) + chatter + fowl
    song += calls(couplets + CHIRP_NOTES, [0], waver=.015, waver_hz=110)  # burred
    song += calls(YELP_CALLS, [0, -16], waver=0.015)
    song *= gain_of(level_db)
    return song + gain_of(2) * scatter(song, t60=0.63)


def open_air(air_db=-75.5, apart=0.5):
    """The hush of the garden, and a light wind that rises on the microphone."""
    hush = rng.standard_normal(N) + apart * rng.standard_normal((2, N))  # partly shared by the ports
    air = colour(hush, AIR_SPECTRUM) * gain_of(air_db + 0.73 * wander(2.1))
    wind = colour(rng.standard_normal((2, N)), WIND_SPECTRUM)
    wind_db = CALM_DB + (GUST_DB - CALM_DB) * ramp(GUST_S, GUST_RISE_S) + 2 * wander(7.3)
    return air + (wind + 3 * wind.mean(0)) * gain_of(wind_db)


def scene():
    """The drill and the shoes close by, the garden behind."""
    tool = near(drill() + clicks(), echo_db=-11.5)
    ground = near(knocks() + churn() + scuffs() + scrapes(), echo_db=-23)
    return tool + ground + creak() + birds() + open_air()


def record(dry):
    """The recorder's low cut and band limit."""
    dry = signal.sosfilt(signal.butter(4, 38, "highpass", fs=SR, output="sos"), dry)
    band_limit = signal.firwin(511, EDGE_HZ, window=("kaiser", 9), fs=SR)
    return signal.oaconvolve(dry, band_limit[None], "same")


dry = scene()
out = record(dry)
wav_out(out)
```